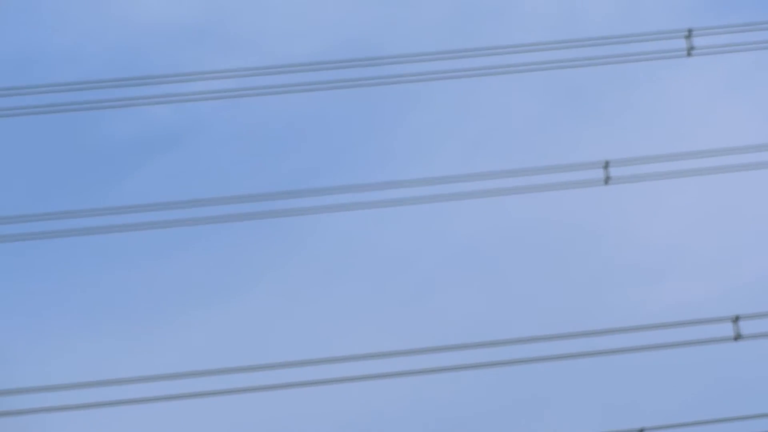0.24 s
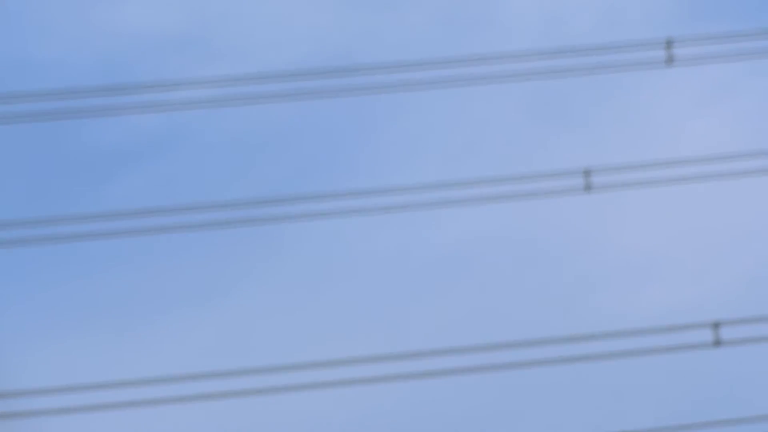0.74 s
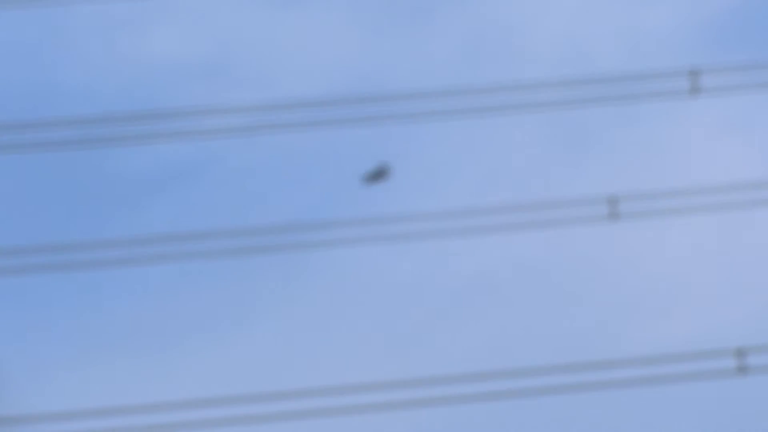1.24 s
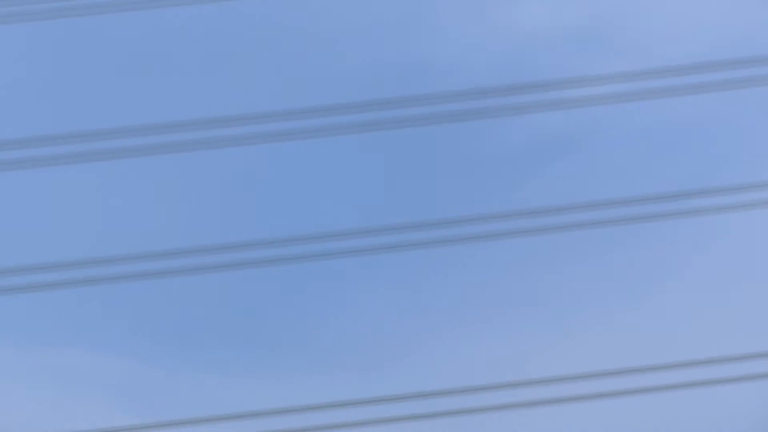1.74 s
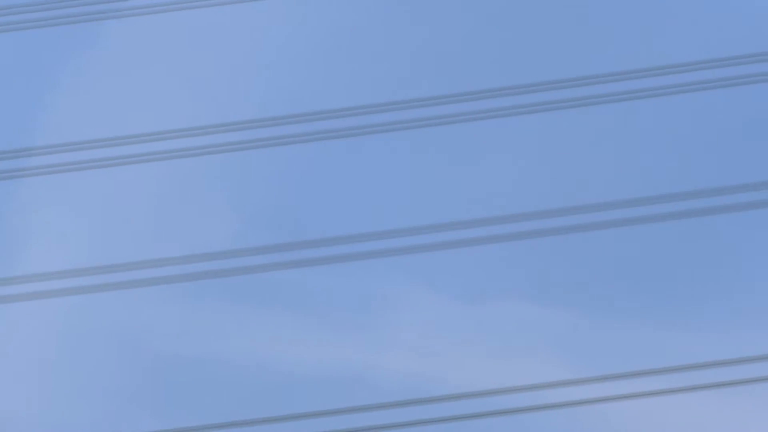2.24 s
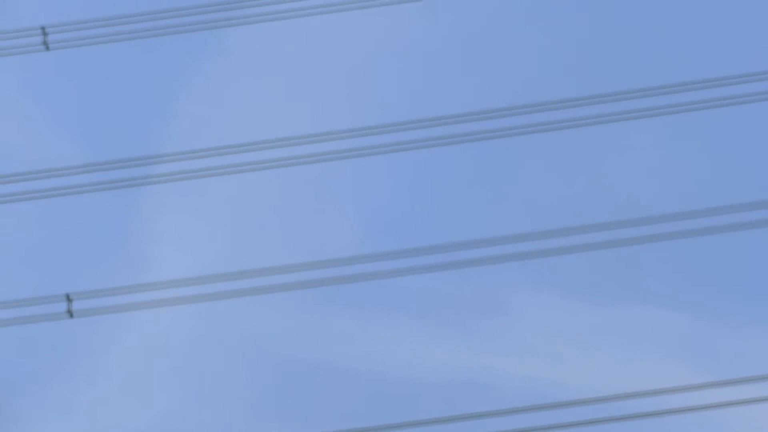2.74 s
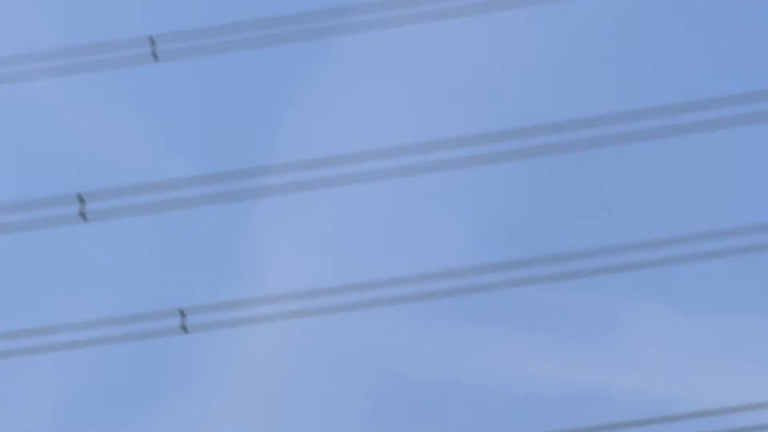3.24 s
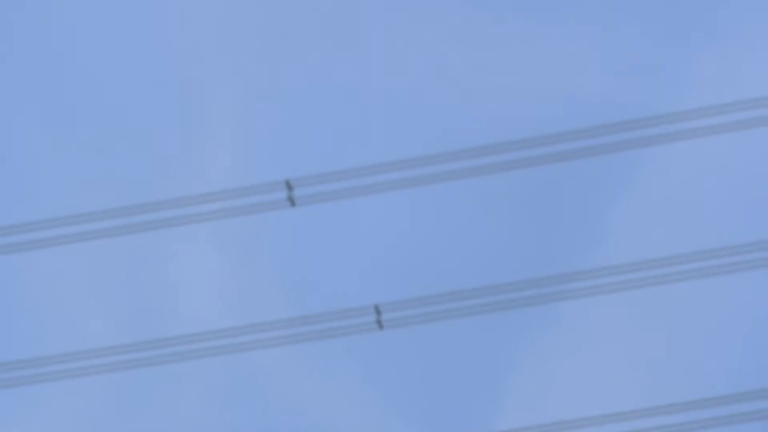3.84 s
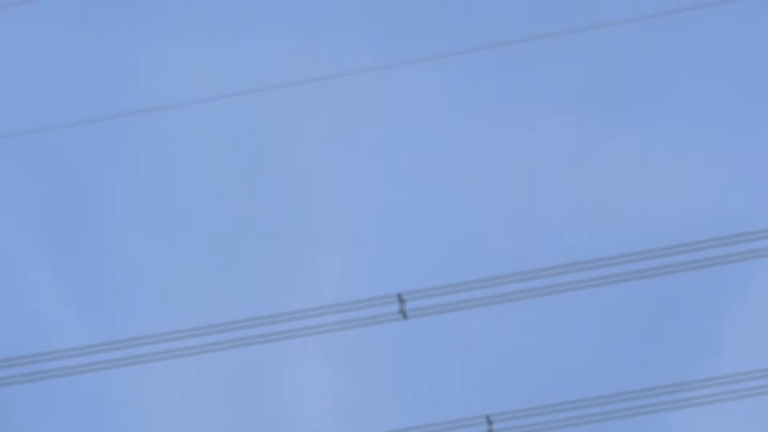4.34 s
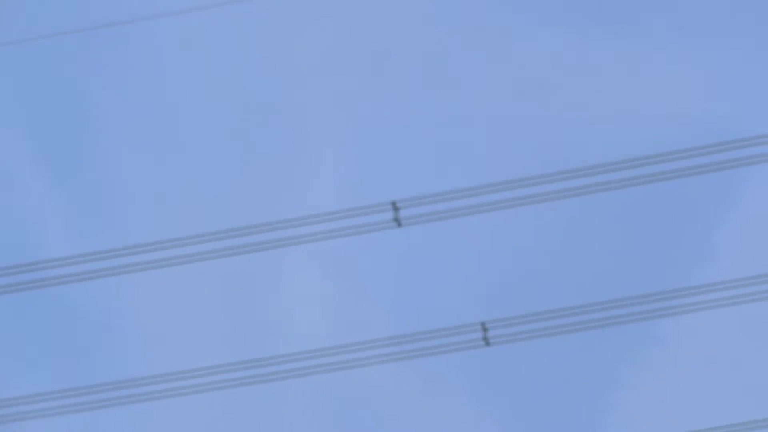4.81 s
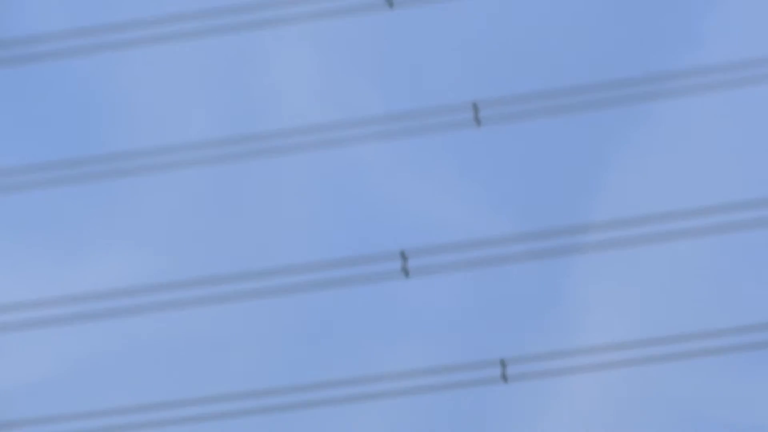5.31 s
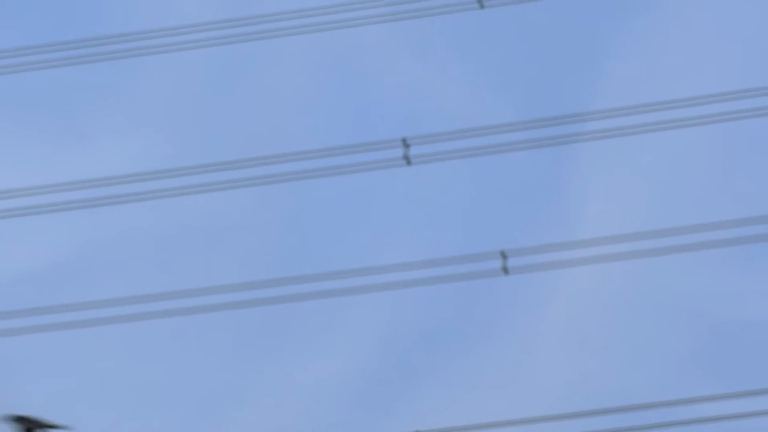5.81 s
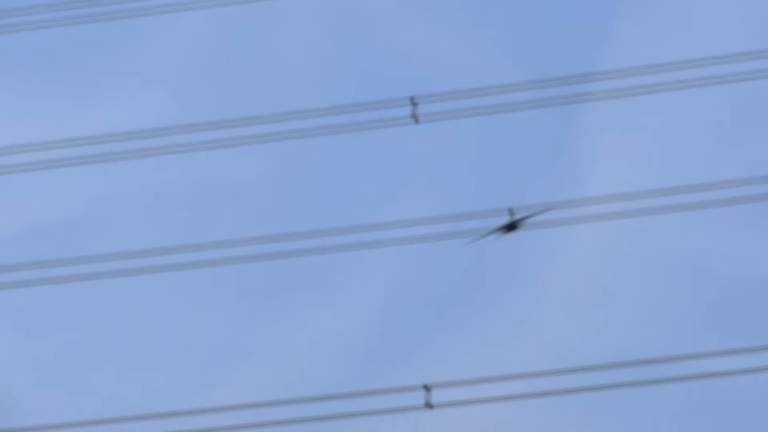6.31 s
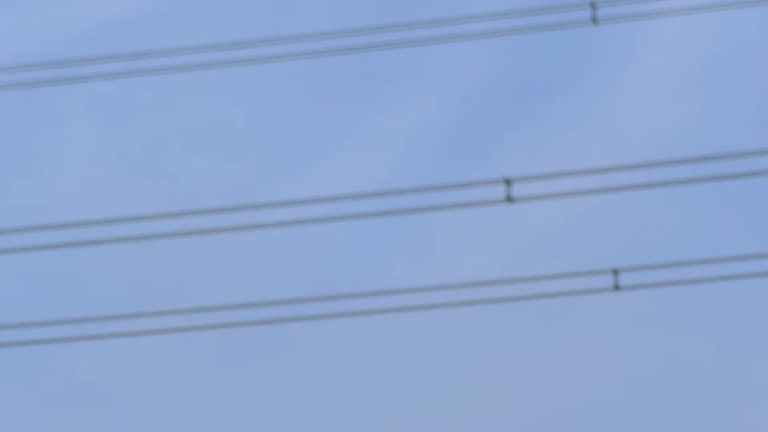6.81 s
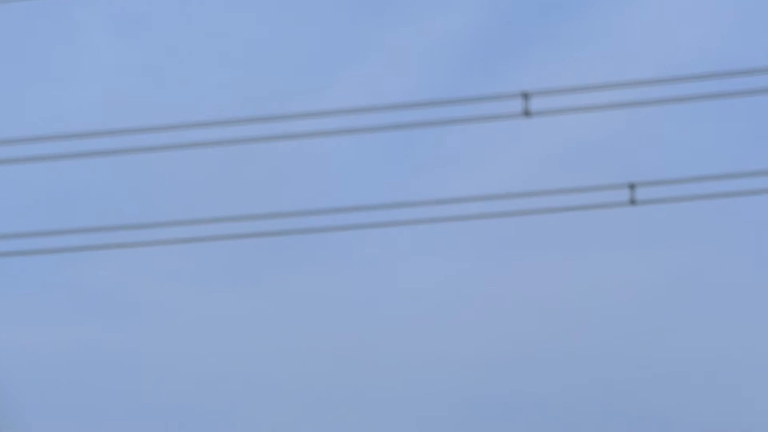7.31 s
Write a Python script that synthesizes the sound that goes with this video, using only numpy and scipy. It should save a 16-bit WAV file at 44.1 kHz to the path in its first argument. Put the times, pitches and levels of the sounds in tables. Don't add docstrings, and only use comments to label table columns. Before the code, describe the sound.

An outdoor stereo scene of swallows circling overhead. From 0 to about 3 seconds they twitter rapidly: tiny squeaky whistles, upward scoops, quick falls and wavering notes, often two pitches at once, with especially bright bursts near 2.1 and 2.6-2.9. More distinct chirps come at 3.2-3.5, then only sparse, weaker calls until about 5.4, with a farther flock chirping faintly behind. Soft scattered notes follow around 6, and from 7.0 to the end the calls are near and loud again, strongest around 7.4. Short reflections from nearby walls trail the chirps. Throughout, cicadas hold a thin, high, finely pulsing whine, one nearby singer fading by 3.5 as another grows; a katydid adds dry treble fizz. Far traffic rumbles softly, faint machine hums swell and pass, and a low gentle wind buffet arrives around 6.

```python
import sys
import numpy as np
from scipy import signal
from scipy.fft import rfft, irfft, next_fast_len
from scipy.io import wavfile
from scipy.ndimage import uniform_filter1d, map_coordinates

SR = 44100
rng = np.random.default_rng(int(sys.argv[2]) if len(sys.argv) > 2 else 0)


def master_out(mix):
    frames = np.transpose(np.atleast_2d(mix))
    ceiling = np.clip(frames, -1, 1)
    pcm = np.round(ceiling * 32767).astype(np.int16)
    wavfile.write(sys.argv[1], SR, pcm)


def rack_gain(trim_db):
    fader = np.asarray(trim_db, float)
    return 10 ** (fader / 20)


N = 333396

# (time [s], length [s], pitch [Hz], level [dB])
HIGH_HOLDS = [(0, 0.02, 5470, -45.5), (0.25, 0.085, 5960, -52), (0.52, 0.037, 6320, -55),
              (0.731, 0.067, 5410, -42.5), (1.146, 0.027, 5200, -47), (1.262, 0.012, 6500, -44),
              (1.431, 0.063, 6170, -39), (2.263, 0.086, 5690, -43.5), (2.434, 0.05, 5360, -46),
              (2.833, 0.041, 5500, -39), (3.223, 0.12, 5370, -46), (3.43, 0.075, 5510, -45),
              (3.522, .083, 5580, -51), (3.841, 0.079, 5370, -50.5), (4.324, .02, 5760, -45),
              (4.306, 0.007, 6700, -43), (4.457, 0.016, 5750, -50), (4.62, 0.034, 5850, -52),
              (4.974, 0.038, 5360, -51), (5.11, 0.041, 5100, -57), (5.204, 0.027, 6520, -52),
              (7.491, 0.027, 5670, -45)]
# (time [s], length [s], pitch [Hz], level [dB])
LOW_HOLDS = [(.045, 0.04, 3630, -48), (.05, 0.078, 3280, -53), (0.085, 0.028, 4630, -50),
             (0.22, 0.028, 2830, -45), (.29, 0.012, 3460, -41), (0.688, 0.11, 4470, -44),
             (0.797, 0.021, 4720, -37.5), (0.846, 0.021, 4790, -46), (0.812, 0.018, 2460, -49),
             (0.986, 0.033, 2350, -51), (1.025, 0.015, 3830, -50), (1.044, 0.011, 1360, -51),
             (1.178, 0.013, 3230, -47), (1.291, 0.024, 4160, -51), (1.338, .018, 2660, -47),
             (1.39, 0.013, 2210, -48.5), (1.438, 0.044, 4456, -42), (2.944, 0.023, 3530, -48),
             (2.979, 0.044, 4010, -46), (3.499, 0.072, 4410, -47), (4.026, .015, 3820, -55),
             (4.083, 0.017, 4410, -57), (4.198, .012, 3720, -60), (4.3, 0.012, 3860, -55),
             (4.338, 0.016, 3880, -56), (5.212, .03, 4020, -51), (5.22, 0.043, 2470, -59),
             (5.288, 0.059, 4220, -51), (5.355, 0.035, 4750, -45.5), (5.524, 0.039, 4510, -54),
             (5.522, 0.029, 3670, -59), (5.678, 0.016, 3830, -50.5), (6.412, 0.023, 2550, -65),
             (6.527, 0.013, 3740, -59), (6.541, 0.017, 4250, -57), (6.582, 0.012, 3760, -56),
             (6.583, 0.013, 4830, -56), (7.12, 0.0098, 1380, -50.5), (7.488, 0.12, 4360, -48)]
# (time [s], length [s], pitch [Hz], level [dB])
FLICKS = [
    (0.056, 0.049, 4300, -42.5),
    (2.342, .035, 5740, -44),
]
# (time [s], length [s], from [Hz], to [Hz], level [dB])
HIGH_SCOOPS = [
    (1.575, .023, 4530, 6600, -43),
    (3.205, 0.03, 4780, 5670, -49),
    (3.678, 0.01, 4140, 5330, -50),
    (4.885, 0.028, 5520, 7000, -42.5),
    (6.854, 0.0086, 3870, 5630, -43.5),
    (6.89, .03, 4850, 5540, -48),
    (7.533, 0.016, 5330, 5690, -31.5),
]
# (time [s], length [s], from [Hz], to [Hz], level [dB])
LOW_SCOOPS = [(.241, 0.018, 2950, 3530, -37), (.46, 0.028, 2400, 3160, -54), (.895, 0.042, 3100, 3820, -54),
              (1.58, .02, 2540, 3980, -47), (2.022, 0.033, 3500, 4520, -49), (2.98, 0.027, 3180, 3540, -50),
              (3.847, .067, 3700, 4270, -51.5), (5.115, .05, 3300, 4200, -57),
              (6.24, .03, 3450, 4250, -53.5), (6.89, .05, 4080, 4800, -52.5), (6.922, .06, 4000, 4800, -49)]
# (time [s], length [s], from [Hz], to [Hz], level [dB])
CLIMBS = [(.28, 0.041, 2030, 2700, -47.5), (.465, 0.023, 4700, 7400, -41), (.578, 0.058, 2300, 3840, -47),
          (.578, 0.018, 4700, 6060, -45), (.62, 0.023, 1800, 2810, -48.5), (.79, 0.022, 2300, 3470, -51),
          (1.17, 0.018, 5100, 7200, -47), (4.158, 0.012, 4700, 5100, -53), (4.21, 0.039, 3000, 3970, -56),
          (4.28, 0.035, 4400, 5700, -50.5), (4.318, 0.024, 4600, 5700, -51),
          (4.372, 0.028, 3360, 4840, -56), (4.473, 0.02, 4200, 5750, -52), (4.5, 0.027, 4000, 5870, -52),
          (4.59, 0.018, 4900, 5840, -48), (4.69, 0.047, 2300, 4400, -55), (5.055, 0.013, 4400, 6000, -51),
          (5.068, .013, 4500, 5900, -49), (5.255, 0.021, 2700, 4330, -55), (6.415, .015, 4700, 5300, -59),
          (6.866, 0.057, 5300, 6570, -49)]
# (time [s], length [s], from [Hz], to [Hz], level [dB])
FALLS = [(.483, 0.011, 6600, 5860, -40), (.545, .013, 6230, 4940, -46), (.698, 0.031, 6170, 5630, -44),
         (1.288, 0.026, 6830, 5040, -41), (3.36, .012, 6500, 5640, -42), (4.902, 0.042, 6130, 5400, -43),
         (5.225, .015, 6300, 4540, -55), (5.228, 0.023, 6650, 4380, -44), (6.158, 0.034, 6400, 5970, -52),
         (6.783, 0.022, 6600, 5070, -51.5), (7.44, 0.014, 6680, 6200, -39)]
# (time [s], pitch [Hz], level [dB])
UPPER_FIRST = [
    [(0.355, 4770, -62), (0.365, 5437, -63), (0.379, 6200, -52), (0.403, 6400, -51.5), (0.425, 6080, -51),
     (0.45, 5653, -45)],
    [(0.615, 3710, -46), (0.635, 5480, -39), (0.641, 6076, -62), (0.659, 6600, -58), (0.677, 6400, -43),
     (0.69, 5852, -56)],
    [(0.738, 5260, -38.5), (0.78, 5920, -44), (0.806, 6170, -53), (0.816, 5900, -51), (0.853, 6300, -53)],
    [(0.9, 4280, -51), (0.914, 5070, -58), (0.942, 5320, -57), (0.958, 6160, -57), (0.972, 6020, -45.5),
     (1.055, 5770, -46)],
    [(1.358, 5330, -49), (1.372, 5663, -50), (1.379, 5664, -34), (1.406, 5800, -51), (1.424, 6140, -37),
     (1.43, 6173, -50)],
    [(1.535, 4709, -50), (1.555, 6430, -40), (1.579, 6560, -37), (1.601, 6250, -42), (1.611, 6010, -38),
     (1.635, 5740, -39)],
    [(2.012, 5820, -70), (2.02, 6380, -66), (2.04, 6669, -41.5), (2.048, 5900, -42), (2.052, 5360, -42),
     (2.057, 4751, -60)],
    [(2.107, 4030, -51), (2.113, 5530, -31), (2.115, 5780, -32), (2.133, 5730, -36), (2.155, 6400, -45),
     (2.2, 6200, -49)],
    [(2.385, 4770, -46), (2.399, 5473, -50), (2.421, 5590, -43), (2.429, 5980, -52), (2.435, 6020, -43),
     (2.47, 5680, -48)],
]
# (time [s], pitch [Hz], level [dB])
UPPER_SECOND = [
    [(2.575, 5760, -53), (2.579, 5600, -59), (2.589, 6180, -37), (2.597, 5520, -35), (2.602, 5100, -48)],
    [(2.65, 4400, -48), (2.654, 5281, -38), (2.66, 5700, -34.5), (2.69, 6300, -51), (2.7, 6075, -51)],
    [(2.705, 6440, -51), (2.715, 6790, -46), (2.727, 6560, -40), (2.741, 4980, -34), (2.749, 4630, -58)],
    [(2.787, 3890, -47), (2.797, 5510, -33), (2.805, 5500, -36), (2.811, 5602, -41), (2.825, 5750, -37),
     (2.885, 6560, -45)],
    [(2.95, 5310, -45), (2.964, 5829, -41), (2.974, 5830, -51), (2.994, 5680, -41.5), (3.024, 5150, -45.5),
     (3.035, 5260, -52)],
    [(3.28, 6645, -59), (3.3, 6470, -47), (3.304, 6470, -56), (3.31, 6150, -42), (3.314, 6000, -35),
     (3.326, 4900, -62)],
    [(3.376, 4600, -43), (3.382, 5390, -31), (3.414, 5630, -42), (3.43, 6190, -45), (3.478, 6010, -44)],
]
# (time [s], pitch [Hz], level [dB])
UPPER_THIRD = [
    [(5.275, 4220, -48), (5.295, 5200, -49), (5.307, 5430, -38.5), (5.317, 5523, -53), (5.335, 5860, -54),
     (5.377, 5940, -55), (5.39, 6350, -47)],
    [(5.945, 4957, -71), (5.965, 6030, -53), (5.977, 6090, -50), (6.023, 5980, -54), (6.03, 5900, -43)],
    [(6.085, 4830, -49), (6.103, 6350, -49), (6.115, 6530, -44), (6.127, 6450, -46), (6.163, 5820, -42),
     (6.169, 5850, -56), (6.2, 5670, -46)],
    [(6.997, 4950, -60), (7.005, 5660, -46), (7.015, 6340, -40.5), (7.045, 6170, -43), (7.073, 5860, -41),
     (7.077, 6000, -40), (7.098, 6510, -47)],
    [(7.142, 4770, -51), (7.148, 5330, -41), (7.16, 6329, -34), (7.17, 6520, -34.5), (7.196, 6120, -37),
     (7.23, 5650, -33), (7.243, 5500, -43)],
    [(7.378, 4409, -56), (7.404, 5540, -40), (7.416, 5778, -38), (7.428, 5810, -29.5), (7.444, 5740, -50),
     (7.466, 5730, -27), (7.497, 5630, -41)],
]
# (time [s], pitch [Hz], level [dB])
LOWER_EARLY = [
    [(0.255, 4417, -61), (0.285, 4530, -52), (0.303, 4560, -57), (0.335, 4700, -63), (0.345, 4500, -62)],
    [(0.39, 4140, -49), (0.406, 4690, -45.5), (0.418, 4480, -49), (0.426, 4477, -64), (0.475, 4498, -47)],
    [(0.955, 4166, -50), (0.983, 4230, -52), (0.999, 4550, -42), (1.017, 4570, -48), (1.04, 4370, -56)],
    [(1.393, 3260, -51), (1.409, 4429, -45), (1.429, 4873, -47), (1.491, 4810, -52), (1.5, 4680, -35)],
    [(1.565, 3710, -44), (1.573, 4290, -45), (1.579, 4570, -46), (1.603, 4596, -39), (1.645, 4595, -53)],
    [(2.135, 3750, -47), (2.139, 3850, -51), (2.159, 4920, -40.5), (2.185, 4930, -40.5), (2.2, 5030, -45)],
    [(2.265, 3680, -72), (2.283, 4150, -46.5), (2.311, 4220, -47), (2.331, 4660, -40), (2.34, 4760, -58)],
    [(2.38, 3390, -70), (2.39, 4110, -51), (2.398, 4670, -49), (2.426, 4460, -47.5), (2.47, 4320, -54)],
    [(2.567, 3290, -52), (2.581, 3970, -45), (2.593, 4010, -44), (2.6, 4100, -47)],
    [(2.672, 3330, -52), (2.7, 4600, -35), (2.73, 5200, -37), (2.754, 5180, -47), (2.77, 5200, -39)],
    [(2.815, 3190, -52), (2.829, 4050, -44), (2.859, 4730, -38), (2.875, 4900, -39), (2.885, 4770, -36)],
]
# (time [s], pitch [Hz], level [dB])
LOWER_LATE = [
    [(3.222, 3770, -58), (3.248, 4100, -52), (3.256, 4090, -51), (3.29, 4450, -43), (3.308, 4140, -49),
     (3.322, 3700, -47)],
    [(3.4, 3160, -53), (3.412, 3720, -49), (3.42, 4160, -46), (3.458, 4676, -38.5), (3.498, 4500, -58)],
    [(4.895, 3900, -63), (4.917, 4380, -52.5), (4.967, 4150, -49), (4.973, 4165, -54), (5.001, 4145, -54),
     (5.02, 4125, -61)],
    [(5.97, 3870, -63), (5.982, 4189, -56), (6.0, 4494, -49), (6.02, 4500, -37.5), (6.032, 4470, -47),
     (6.065, 4800, -56)],
    [(6.08, 3050, -61), (6.092, 3720, -61), (6.102, 3756, -54), (6.126, 4690, -50.5), (6.166, 4490, -47),
     (6.175, 4580, -57)],
    [(6.998, 3440, -61), (7.018, 4200, -53), (7.044, 4450, -38), (7.062, 4450, -37), (7.074, 4600, -46),
     (7.097, 4980, -41.5)],
    [(7.138, 3000, -60), (7.144, 3500, -53), (7.154, 4100, -45), (7.164, 4050, -45), (7.192, 4550, -37),
     (7.245, 4380, -46)],
    [(7.377, 3095, -53), (7.391, 3386, -50.5), (7.411, 3970, -47), (7.441, 4468, -36), (7.487, 4480, -45)],
]
# (time [s], level [dB])
FLOCK_LEVEL = [(0, -58), (.5, -46.5), (1.1, -48.5), (1.55, -48), (1.75, -81), (2.2, -64), (2.9, -55),
               (3.6, -58.5), (4.5, -55), (5.3, -52), (5.9, -69), (6.5, -70), (6.8, -89)]
# (frequency [Hz], density [dB per Hz])
CHORUS = [(5500, -120), (6300, -21), (7300, -13), (7900, -8), (8700, -7), (9400, -14.5), (10500, -35),
          (12000, -120)]
# (time [s], rate [clicks/s], level [dB])
LEAVING = [
    (0, 71.8, -50),
    (1.2, 70.6, -48.5),
    (2.6, 70.3, -55),
    (3.5, 70.3, -70),
]
# (time [s], rate [clicks/s], level [dB])
ARRIVING = [
    (1.6, 59.9, -60),
    (2.8, 60.35, -50.5),
    (4.6, 61.15, -48),
    (6.3, 61.2, -48),
    (7.56, 60.7, -49),
]
# (frequency [Hz], gain [dB])
DRUM = [
    (7900, 10),
    (8490, 5),
    (8780, 6),
    (9060, 4),
]
# (time [s], level [dB])
KATYDID_LEVEL = [
    (0, -54),
    (3.4, -50.5),
    (3.7, -58),
    (4.1, -57),
    (4.35, -52.5),
    (5.6, -54.5),
    (6.2, -60),
    (7.56, -55),
]
# (frequency [Hz], density [dB per Hz])
TOWN = [(30, -6.5), (70, -0.5), (150, -9), (722, -13.5), (950, -21), (2000, -27.5), (3200, -29.5),
        (6000, -25.5), (10500, -24), (15000, -80)]
# (frequency [Hz], correlation [-1..1])
ALIKE = [(50, 0.97), (170, 0.84), (600, 0.96), (1300, 0.69), (3000, 0.45), (10000, 0.088)]
# (frequency [Hz], peak level [dB], peak time [s], swell reach [s])
HUMS = [
    (39, -55, 3.4, 14),
    (73, -56, 0.73, 2.9),
    (260.6, -59.5, 1.7, 4.6),
    (367, -59.5, 8.2, 5.1),
    (562.5, -55, 6.35, 1.04),
    (714, -59.5, 6.1, 1.2),
    (727, -52.5, 4.2, 0.16),
]
# (time [s], level [dB])
SCRAPES = [
    (.482, -46),
    (2.585, -41),
    (4.325, -48),
    (5.235, -49),
]

ARCH_HZ, FLICK_HZ = 98.6, 450
SCOOP_DONE, CLIMB_DONE, FALL_DONE, FLICK_DONE = 0.74, 0.6, 0.311, 0.082
SPLIT_HZ = 5120
CALL_DB = 2.5
SLAP_S, SLAP_DB = 0.016, -16
SCRAPE_S = 0.015
TOP_HZ = 15750


def unit(x):
    return x / np.sqrt(np.mean(x ** 2) + 1e-20)


def along(points, hz):
    f, v = np.transpose(points)
    return np.interp(np.log(hz + 1), np.log(f + 1), v)


def timeline(points):
    s, v = np.transpose(points)
    return np.interp(np.arange(N) / SR, s, v)


def wobble(rate_hz):
    knots = rng.standard_normal(int(N * rate_hz / SR) + 4)
    return map_coordinates(knots, [np.arange(N) * rate_hz / SR])


def filtered(x, response):
    m = next_fast_len(N + SR // 2)
    return irfft(rfft(x, m) * response(np.fft.rfftfreq(m, 1 / SR)), m)[..., :N]


def rush(gain, alike):
    def mid_side(hz):
        turn = np.arccos(np.clip(alike(hz) + 0 * hz, -1, 1)) / 2
        return gain(hz) * np.array([np.cos(turn), np.sin(turn)])

    mid, side = filtered(rng.standard_normal((2, N)), mid_side)
    return unit(np.array([mid + side, mid - side]))


def whistles(rows, flutter_db, waver):
    out = np.zeros(N + SR)
    breath = np.resize(wobble(120), N + SR)
    drift = np.resize(wobble(150), N + SR)
    edge_s = 0.005
    for s, length_s, start_hz, mid_hz, end_hz, db in rows:
        far = np.clip((-28.5 - db) / 12, 0.5, 1.4)
        t = np.arange(int((length_s + edge_s) * SR)) / SR
        u = (t - edge_s / 2) / length_s
        hz = 2 * (u - 0.5) * (u - 1) * start_hz
        hz += -4 * u * (u - 1) * mid_hz
        hz += 2 * u * (u - 0.5) * end_hz
        at = max(int((s - edge_s / 2) * SR), 0)
        span = slice(at, at + len(t))
        fade = np.clip(np.minimum(t, t[-1] - t) / edge_s, 0, 1)
        shaken_hz = hz * (1 + far ** 2 * waver * drift[span])
        tone = np.sin(2 * np.pi * np.cumsum(shaken_hz) / SR)
        out[span] += rack_gain(db + far * flutter_db * breath[span]) * fade * tone
    return out[:N]


def calls(tables, flutter_db):
    out, breath = np.zeros(N), wobble(130)
    for rows in tables:
        s, hz, db = np.transpose(rows)
        span = np.arange(int(s.min() * SR), int(s.max() * SR))
        t = span / SR
        fade = np.clip(np.minimum(t - t[0], t[-1] - t) / 0.001, 0, 1)
        bend_hz = uniform_filter1d(np.interp(t, s, hz), size=200, mode="nearest")
        level_db = uniform_filter1d(np.interp(t, s, db), size=350, mode="nearest")
        level = rack_gain(level_db + CALL_DB + flutter_db * breath[span])
        out[span] += np.sqrt(2) * level * fade * np.sin(2 * np.pi * np.cumsum(bend_hz) / SR)
    return out


def glide(rows, done):
    return [(s, length_s, a, a + done * (b - a), b, db) for s, length_s, a, b, db in rows]


def strokes():
    bow = ARCH_HZ / 2
    notes = [(s, n, hz - bow, hz + bow, hz - bow, db) for s, n, hz, db in HIGH_HOLDS + LOW_HOLDS]
    notes += glide([(s, n, hz, hz + FLICK_HZ, db) for s, n, hz, db in FLICKS], FLICK_DONE)
    notes += glide(HIGH_SCOOPS + LOW_SCOOPS, SCOOP_DONE)
    notes += glide(CLIMBS, CLIMB_DONE)
    notes += glide(FALLS, FALL_DONE)
    notes = np.array(notes)
    high = notes[:, 2:5].max(axis=1) > SPLIT_HZ
    return notes[high], notes[~high]


def swallows():
    high, low = strokes()
    upper = whistles(high, flutter_db=2.5, waver=0.00277)
    upper += calls(UPPER_FIRST + UPPER_SECOND + UPPER_THIRD, flutter_db=2.0)
    lower = whistles(low, flutter_db=2.5, waver=0.0033)
    lower += calls(LOWER_EARLY + LOWER_LATE, flutter_db=1.5)

    loudness = np.sqrt(np.abs(uniform_filter1d(upper ** 2 + lower ** 2, size=300)))
    scale = loudness + 0.0014
    second = rack_gain(2.5) * upper * lower + rack_gain(-11.5) * upper ** 2 + rack_gain(-6.0) * lower ** 2
    third = rack_gain(-3.5) * lower ** 2 * (lower + 1.1 * upper)
    throat = [(800, -65), (1500, -23.5), (6500, -9), (8000, -1.0)]  # (Hz, dB)
    mixed = filtered(second / scale, lambda hz: rack_gain(along(throat, hz)))
    mixed += filtered(third / scale, lambda hz: hz > 11500)

    breath = [(1200, -18.0), (3000, -13.0), (5500, -8.5), (8000, -3.5), (15000, -10.5)]  # (Hz, dB)
    rasp = filtered(rng.standard_normal(N), lambda hz: rack_gain(along(breath, hz)))
    return upper + lower + mixed + rack_gain(-12.5) * loudness * unit(rasp)


def flock(count=900):
    when, pitch, rise, life, size = rng.random((count, 5)).T
    start_s, length_s = when * N / SR, 0.01224 + 0.02495 * life
    low_hz = 2100 + 3300 * pitch
    mid_hz = low_hz + 450 + 600 * rise
    top_hz = low_hz + 850 + 1100 * rise
    rows = np.transpose([start_s, length_s, low_hz, mid_hz, top_hz, 3 * size])
    return rack_gain(timeline(FLOCK_LEVEL)) * unit(whistles(rows, flutter_db=6.5, waver=0.018))


def walls(x, t60_s):
    out, hop = np.zeros((2, N + SR)), SR // 8
    t = np.arange(SR // 2) / SR
    for at in range(0, N, hop):
        shared, left, right = rng.standard_normal((3, len(t)))
        faces = rng.random(len(t)) < 0.006
        shared = shared * (0.5 + 9 * faces)
        tail = shared + 0.54 * np.array([left, right])
        tail = tail * rack_gain(-60 * t / t60_s) * (t > 0.004)
        wet = signal.fftconvolve(x[None, at:at + hop], tail / np.linalg.norm(tail[0]), axes=1)
        out[:, at:at + wet.shape[1]] += wet
    return out[:, :N]


def drummer(rows, drum):
    rate = np.transpose(rows)[1]
    rate_hz = uniform_filter1d(timeline([row[:2] for row in rows]), size=SR // 2) + 0.06 * wobble(6)
    turns = 2 * np.pi * np.cumsum(rate_hz) / SR
    fading, wander = rack_gain(3 * wobble(4)), 1.5 * wobble(9)
    lines = np.zeros((2, N))
    for k in np.arange(7300 // rate[0], 9600 // rate[0]):
        hz = k * rate.max()
        resonance = 0.5 + sum(rack_gain(g) / (1 + ((hz - c) / 80) ** 2) for c, g in drum)
        fade = np.roll(fading, rng.integers(N))
        phase = np.roll(wander, rng.integers(N)) + rng.uniform(0, 2 * np.pi)
        ear_phase = rng.normal(0, 1.3, (2, 1))
        lines += rack_gain(along(CHORUS, hz)) * resonance * fade * np.sin(k * turns + phase + ear_phase)
    level_db = timeline([(s, db) for s, _, db in rows])
    return rack_gain(level_db) * unit(lines)


def cicadas():
    chorus = rack_gain(-47.2) * rush(lambda hz: rack_gain(along(CHORUS, hz)), lambda hz: 0.3)
    return (chorus + drummer(LEAVING, []) + drummer(ARRIVING, DRUM)) * rack_gain([[1.8], [-1.8]])


def katydid():
    fizz = rush(lambda hz: 1 / (hz + 1) / (1 + (10500 / (hz + 1)) ** 8), lambda hz: 0.017)
    return rack_gain(timeline(KATYDID_LEVEL)) * fizz


def rumble():
    return rack_gain(-46.0) * rush(lambda hz: rack_gain(along(TOWN, hz)), lambda hz: along(ALIKE, hz))


def machine_hums():
    t, out = np.arange(N) / SR, np.zeros(N)
    for hz, db, peak_s, reach_s in HUMS:
        level_db = db + 2.3 * wobble(2.29) - 6.4 * ((t - peak_s) / reach_s) ** 2
        out += rack_gain(level_db) * np.sin(2 * np.pi * np.cumsum(hz + 1.223 * wobble(4)) / SR)
    return out


def scrapes():
    t = np.arange(N) / SR
    swell = sum(rack_gain(db) * np.exp(-((t - s) / SCRAPE_S) ** 2) for s, db in SCRAPES)
    return swell * rush(lambda hz: hz > 9500, lambda hz: 0.5)


def wind_puff():
    onset = np.clip((np.arange(N) / SR - 5.9) / 0.25, 0, 1)
    return rack_gain(-48.0) * onset * rush(lambda hz: np.exp(-((hz - 38) / 9) ** 2), lambda hz: 1)


def scene():
    near, far = swallows(), flock()
    dull = filtered(rack_gain(2.5) * near, lambda hz: 1 / (1 + (hz / 9500) ** 4) / (1 + (2800 / (hz + 1)) ** 4)) + far
    ports = filtered(near + rack_gain(-11) * far, lambda hz: np.exp(np.outer([-0.5j, 0.5j], (hz / 10500) ** 2)))
    ports = ports + rack_gain(SLAP_DB) * np.roll(near, int(SLAP_S * SR))
    birds = (ports + walls(dull, t60_s=0.33)) * rack_gain([[0.7], [-0.7]])
    town = (rumble() + machine_hums() + wind_puff()) * rack_gain([[0.3], [-0.3]])
    return birds + cicadas() + katydid() + scrapes() + town


def top_cut(x):
    return signal.sosfilt(signal.butter(12, 16070, fs=SR, output="sos"), x)


def record(dry):
    mix = filtered(dry, lambda hz: hz < TOP_HZ)
    return top_cut(mix)


dry = scene()
out = record(dry)
master_out(out)
```